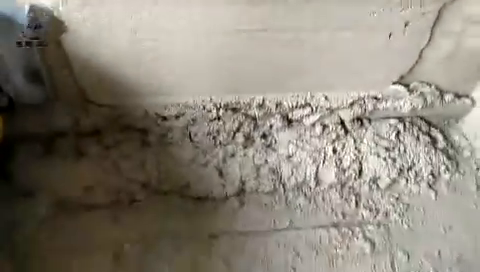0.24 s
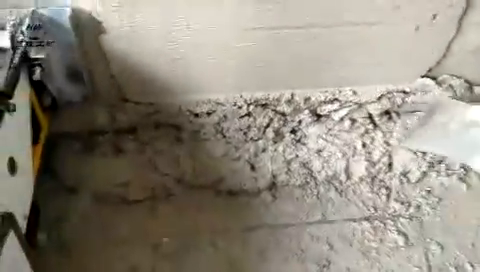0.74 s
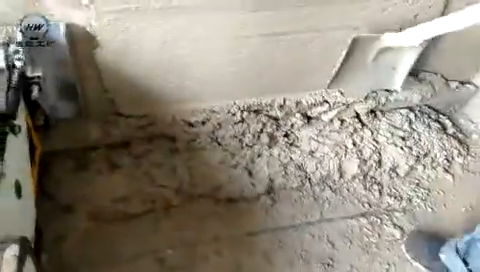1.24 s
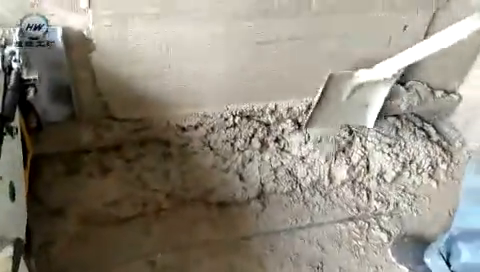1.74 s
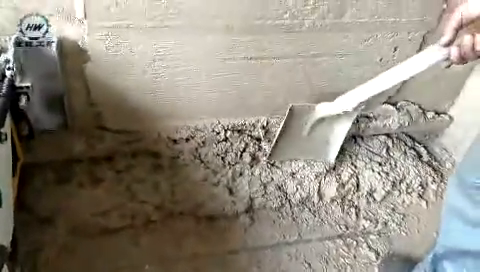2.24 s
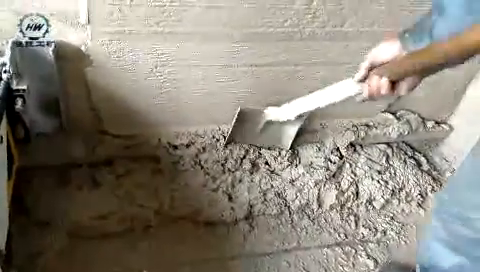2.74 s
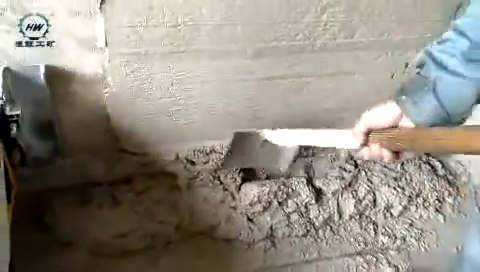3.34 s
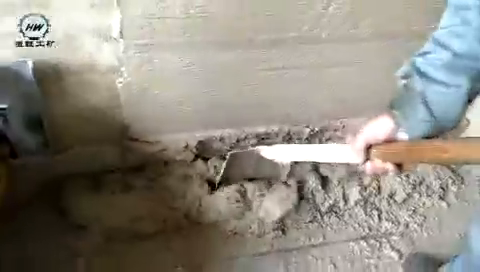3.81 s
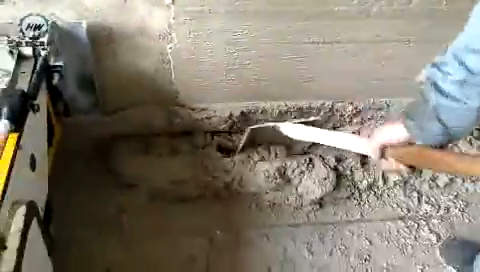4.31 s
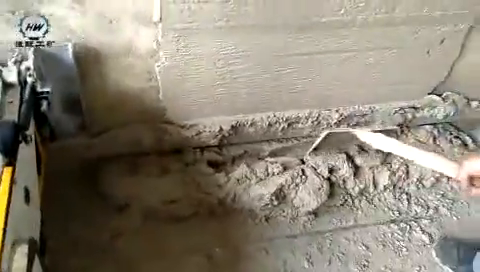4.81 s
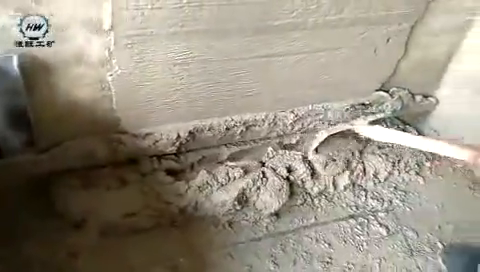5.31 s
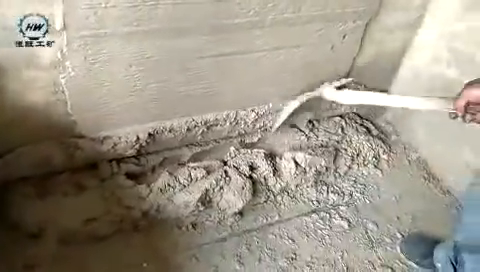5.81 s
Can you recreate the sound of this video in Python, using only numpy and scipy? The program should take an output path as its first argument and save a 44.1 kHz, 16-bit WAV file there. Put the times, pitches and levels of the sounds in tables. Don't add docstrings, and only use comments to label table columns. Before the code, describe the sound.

A steel shovel works gritty wet mortar on a concrete floor, quiet shuffles and stone ticks building to hard chops and loud scrapes in a bare room.

```python
import sys
import numpy as np
from scipy import signal
from scipy.fft import rfft, irfft
from scipy.io import wavfile
from scipy.ndimage import uniform_filter1d

SR = 44100
rng = np.random.default_rng(int(sys.argv[2]) if len(sys.argv) > 2 else 0)


def generate_wav(sig):
    pcm = np.round(np.clip(np.atleast_2d(sig).T, -1, 1) * 32767).astype(np.int16)
    wavfile.write(sys.argv[1], SR, pcm)


def gain_from_decibels(decibels):
    exponent = np.asarray(decibels, float) / 20
    return 10 ** exponent


N = 267334
OPPOSITE = np.array([[1], [-1]])
ALIKE_HZ = 1460


def unit(x):
    return x / np.sqrt(np.mean(x ** 2))


def energy_one(response):
    return response / np.sqrt(np.sum(response ** 2))


def fold(x, response):
    return signal.fftconvolve(x, response, axes=-1)[..., :N]


def highpass(x, order, cutoff_hz):
    return signal.sosfilt(signal.butter(order, cutoff_hz, "high", fs=SR, output="sos"), x)


def colour(points, size=2048):
    hz, db = np.transpose(points)
    grid_hz = np.maximum(np.arange(size + 1) * SR / (2 * size), 1)
    cepstrum = irfft(np.interp(np.log(grid_hz), np.log(hz), db) * np.log(10) / 20)
    cepstrum[1:size] *= 2
    cepstrum[size + 1:] = 0
    return irfft(np.exp(rfft(cepstrum)))[:size]


def ring(modes):
    t = np.arange(SR // 2) / SR
    return energy_one(sum(gain_from_decibels(db) * np.sin(2 * np.pi * hz * t) * 1000. ** (-t / t60_s) for hz, db, t60_s in modes))


def body(outline, modes, ring_db):
    return energy_one(np.convolve(colour(outline), np.r_[1, gain_from_decibels(ring_db) * ring(modes)]))


def walk(rate_hz):
    hold = int(SR / rate_hz)
    levels = rng.standard_normal(N // hold + 1)
    return uniform_filter1d(np.repeat(levels, hold), hold)[:N]


def swell(peak_s, peak_db, rise_s, fall_s):
    t = np.arange(N) / SR - peak_s
    return gain_from_decibels(peak_db - 20 * np.maximum(-t / max(rise_s, .003), t / max(fall_s, .003)))


def sand(spread_db, patchy_db):
    loudness = np.minimum(rng.exponential(size=N), 6)
    clicks = rng.standard_normal(N) * gain_from_decibels(spread_db * loudness)
    return unit(clicks * gain_from_decibels(patchy_db * (walk(45) + walk(160))))


# (frequency [Hz], density [dB per Hz])
AIR = [(18, -27.5), (30, 0), (49, -20.5), (92, -21), (192, -20.5), (996, -25.5), (2830, -22), (3490, -23),
       (4910, -22), (5590, -12), (8280, -29.5), (8950, -27.5), (15500, -24.5)]


def air():
    mid, side = fold(rng.standard_normal((2, N)), colour(AIR)[None])
    side = highpass(side, 1, 300)
    return unit(mid + 0.95 * side * OPPOSITE) * gain_from_decibels(-62.5 + 1.4 * walk(6))


# (peak time [s], level [dB], 20 dB rise [s], 20 dB fall [s])
STEPS = [(.001, -61, .05, 0.1), (1.21, -59.5, 0.3, 0.1), (2.06, -41, 0.04, 0.4), (2.41, -47.5, -0.25, .24),
         (3.02, -62.5, -3.3, 0.5), (3.66, -59, 0, -3.5), (3.95, -38, 0.17, 0.27), (4.15, -59.5, -0.4, -0.6),
         (5.1, -65.5, -0.1, 0.1), (5.722, -49, -0.06, .06), (5.86, -25.5, -0.13, 0), (5.92, -62, 0.2, 7)]
# (frequency [Hz], width [Hz], level [dB])
SLAB = [(69, 3.5, -6.5), (124.6, 8.13, 2.5)]


def footfalls():
    tones = ring([(hz, db, 1.5 / width_hz) for hz, width_hz, db in SLAB])
    mid, side = fold(rng.standard_normal((2, N)), tones[None])
    rest_db = -94
    weight = gain_from_decibels(rest_db) + sum(swell(*step) for step in STEPS)
    return unit(mid + 0.135 * side * OPPOSITE) * weight * gain_from_decibels(-6)


# (time [s], crack peak [dB], blade re crack [dB], knock re crack [dB])
CHOPS = [(0.061, -42, -34, -30), (0.14, -46, -17, -42), (0.7916, -43, -28, -41), (1.164, -49, -16, -16),
         (1.2077, -44, -4, -14), (2.711, -43.5, 6, -18), (2.7598, -43.5, 9.5, -1),
         (2.805, -40.5, -15, -4.5), (4.095, -20.5, -18.5, -43), (4.122, -17, 4, -10),
         (4.125, 2, -17.5, -23.5), (4.1384, -20.5, 10.5, -4), (4.1595, -17, -1.5, -16),
         (4.638, -22.5, -3, -19), (4.6418, -8, -2.5, -26), (4.6525, -6, -3, -17.5),
         (5.0943, -8.5, -11, -12), (5.103, -0.5, -16.5, -40.5), (5.1123, -3, -9, -17),
         (5.596, -36.5, -10, -28), (5.7128, -37, 7, 5.5)]
# (time [s], crack peak [dB], blade re crack [dB])
TICKS = [(0.412, -41.5, -31), (0.63, -43, -15), (0.716, -44, -17), (1.5296, -41, -16), (1.6284, -34.5, -15),
         (3.4386, -46, -21), (3.608, -30, -30), (3.517, -28.5, -20.5), (4.076, -36.5, -30),
         (4.3883, -27.5, -33), (4.4504, -21, -14), (5.5523, -44, -5), (5.5735, -44, -4), (5.6426, -41, 5),
         (5.78, -35, -24)]
# (time [s], crack peak [dB], blade, knock, thud re crack [dB])
THUDS = [
    (0.849, -51, -9, -23, -19),
    (2.0416, -19.5, 1, 7, 8.5),
    (2.558, -52.5, 4, 16.5, -14),
    (3.894, -41, -1, -3.5, 12.5),
    (5.1631, -18.5, -5, -1.8, -5),
    (5.8386, -11, -7, -21, -17),
    (5.8495, -6.5, -8, -7, -4),
]


def blows(grains, bodies):
    out, t = np.zeros(N + SR), np.arange(SR // 8) / SR
    # time, crack, blade, knock, thud, crunch length [s]
    hits = [(*chop, -42.5, .0077) for chop in CHOPS]
    hits += [(*thud, .0092) for thud in THUDS]
    hits += [(*tick, -32, -43.5, .0019) for tick in TICKS]
    for s, crack_db, blade_db, knock_db, thud_db, length_s in hits:
        shape = (1 - np.exp(-t / (0.18 * length_s))) * np.exp(-t / length_s)
        gains = gain_from_decibels(crack_db + np.array([-14, -21.5, blade_db - 4, knock_db, thud_db - 1.5]))
        start = min(int(s * SR), N - len(t))
        for gain, grain, response in zip(gains, grains, bodies):
            burst = signal.fftconvolve(shape * grain[start:start + len(t)], response)
            out[start:start + len(burst)] += gain * np.sqrt(np.sum(shape ** 2)) * energy_one(burst)
    return out[:N]


# (peak time [s], grit [dB], 20 dB rise [s], 20 dB fall [s], heap rumble re grit [dB])
SHUFFLES = [
    (.08, -47.5, 0, 0.245, -30),
    (.3, -65.5, -0.5, -0.1, -20),
    (.81, -45, 0.08, 0.12, -28.5),
    (.86, -57.5, 0.2, -0.2, -25),
    (1.64, -58, 0.2, 0.18, -21),
    (2.04, -33, 0.0444, -0.2132, -15),
    (2.376, -54, .04, -0.33, -4),
    (3.006, -50.5, -0.1, 0.03, -2.5),
    (4.09, -55, 0.08, -1.3, -1),
    (4.12, -14, -0.1775, -0.05, -32),
]
DRAGS = [
    (.53, -47.5, 0.043, 0.16, -14.5),
    (1.17, -55, 0.019, 0.16, -17.5),
    (1.225, -50.5, .06, 0.076, -24),
    (1.41, -60, 0.074, 0.51, -23),
    (1.52, -55, 0.6, 0.11, -22.5),
]
SCOOPS = [
    (2.1, -42, 0.036, 0.088, 6),
    (2.56, -53, 0.018, 0.13, 5.5),
    (3.92, -47, 0.054, 0.087, 13),
    (5.09, -44.5, 0.0083, 0.031, -15.5),
]
GRINDS = [
    (2.72, -37.5, 0.013, 0.015, -25),
    (2.765, -44, 0.022, 0.11, -34),
    (2.82, -49, 0.069, 0.47, -17),
    (2.884, -54, 0.15, 0.033, -24),
]
SIFTS = [
    (3.232, -58.5, .3, 0.21, -14),
    (3.44, -49, 0.015, 0.33, -13),
    (3.512, -38.5, 0.085, 0.092, -18.5),
    (3.61, -55, .012, .2, -5),
    (3.726, -44.5, .12, 0.11, -4),
    (3.83, -51, 0.22, 0.14, -8),
]
SLUMPS = [(2.15, -52, .05, 0.34, -18), (4.216, -49, .021, 0.29, -22), (4.38, -47.5, 0.3, 0.083, -20.5),
          (4.6, -55, 0.31, 0.016, -15.5), (4.72, -34.5, 0.013, 0.13, -48), (4.892, -51, 0.073, 0.05, -7),
          (4.99, -61.5, 0.049, 0.14, -5.5), (5.2, -41, .03, 0.15, -8), (5.41, -57.5, 0.15, 0.11, -12),
          (5.52, -61, 0.23, 0.065, -16.5), (5.92, -42.5, 0.016, 0.14, 1), (6.02, -42.5, 0.077, 0.025, -20)]
SCRAPES = [
    (5.616, -38.5, 0.065, 0.34, -29),
    (5.74, -22, 0.05, 0.077, -30),
    (5.78, -28, 0.044, 0.028, -32.5),
]


def strokes():
    # (strokes, fine sand, blade rasp, blade knock re grit [dB])
    kinds = [(SHUFFLES, -16.5, -10.5, -22.5), (DRAGS, -19, -6, -23), (SCOOPS, -16.5, 5, -5.5),
             (GRINDS, -16, -6, -12), (SIFTS, -14, -11, -37.5), (SLUMPS, -12, -8.5, -20.5),
             (SCRAPES, -31.5, -5.5, -26)]
    gains = np.zeros((5, N))
    for rows, fine_db, rasp_db, knock_db in kinds:
        for *stroke, heap_db in rows:
            heap = gain_from_decibels(heap_db)
            mix = np.array([1, gain_from_decibels(fine_db), gain_from_decibels(rasp_db), gain_from_decibels(knock_db) + heap, heap])
            gains += mix[:, None] * swell(*stroke)
    return gains * gain_from_decibels([-12, -7, -2.5, -10.5, -7.5])[:, None]


# (time [s], peak [dB], frequency [Hz], rub length [s])
CLINKS = [(0.522, -61, 660, .03), (0.854, -60, 500, 0.027), (1.2, -62.5, 600, 0.033),
          (1.39, -57, 1770, .015), (1.479, -47, 2400, 0.036), (2.042, -17.5, 810, .012),
          (2.559, -50.5, 357, 0.022), (2.569, -46.5, 1340, 0.035), (2.562, -47, 2300, .04),
          (2.754, -42, 1040, 0.01), (2.758, -44, 1770, .01), (2.803, -42, 1080, .04),
          (2.815, -46, 1550, .04), (2.839, -57, 760, .03), (3.897, -44, 1900, 0.02), (3.902, -48, 772, .04),
          (4.126, -22, 840, 0.018), (4.141, -26.5, 2330, 0.012), (4.65, -29, 905, 0.019),
          (5.111, -28, 614, 0.021), (5.572, -44.5, 3100, 0.011), (5.615, -48.5, 1900, 0.013),
          (5.634, -30, 3100, .012), (5.71, -34, 620, .05), (5.168, -30, 620, .03), (5.848, -22, 566, 0.018)]


def clinks(grain):
    out, t = np.zeros(N + SR), np.arange(SR // 6) / SR
    decay_cycles = 18
    for s, db, hz, length_s in CLINKS:
        start = int(s * SR)
        rub = grain[start:start + len(t)] * np.exp(-t / max(length_s, .003))
        panel = np.sin(2 * np.pi * hz * t) * 1000. ** (-t * hz / decay_cycles)
        tone = highpass(np.convolve(rub, panel[:SR // 20]), 3, .6 * hz)
        out[start:start + len(tone)] += gain_from_decibels(db) * tone / np.abs(tone).max()
    return out[:N]


# (frequency [Hz], level [dB])
GRIT = [(1800, -91), (3200, 2.5), (4000, 2), (5500, -2.5), (7000, -2), (8500, -29), (12000, -50.5)]
FINE = [(5000, -53.5), (7000, 5), (8000, 8.5), (10000, 7.5), (12500, 1), (14800, -17)]
RASP = [(500, -59), (1000, -4), (1400, -0.5), (2300, 5), (3300, -1), (4500, -17), (9000, -82.5)]
KNOCK = [(200, -63.5), (420, -12.5), (600, 1), (900, 1), (1300, -6), (2500, -24), (6000, -88.5)]
HEAP = [(30, -44.5), (100, -16), (200, 1.5), (330, 8), (500, -0.5), (900, -36.5), (2000, -69.5)]
# (frequency [Hz], level [dB], T60 [s])
BLADE = [(885, 0, .15), (1660, -3, .1), (2290, -4, .1)]
ROOM_MODES = [(182, 0, 0.45), (233.7, 0, 0.51), (370, 1, 0.23), (433, -8, 0.51), (475, -6.5, .25),
              (119.2, 16.5, 0.092)]


def shovel():
    bodies = (energy_one(colour(GRIT)), energy_one(colour(FINE)), body(RASP, BLADE, -30),
              body(KNOCK, BLADE, -37.5), body(HEAP, ROOM_MODES, -21.5))
    crunch, chatter, lumps = sand(3.2, 2.8), sand(3.2, 3.2), sand(1.5, 1.4)
    grains = crunch, crunch, chatter, lumps, lumps
    stroked = sum(fold(gain * grain, response) for gain, grain, response in zip(strokes(), grains, bodies))
    return blows(grains, bodies) + stroked + clinks(chatter)


def ports(near):
    wander_s, treble_db, lean = 0.0092, 1.5, 0.24
    treble = highpass(near, 1, ALIKE_HZ) * gain_from_decibels(treble_db)
    side = treble * (lean + unit(walk(1 / wander_s)))
    return (near + side * OPPOSITE) * gain_from_decibels([[.7], [-.7]])


# (frequency [Hz], T60 [s])
ROOM_T60 = [(100, 0.2), (260, 0.34), (700, 0.28), (1840, 0.19), (4850, 0.18), (12800, 0.19)]


def room():
    t, tail, build_s = np.arange(int(.7 * SR)) / SR, 0, 0.0026
    hz, t60_s = np.transpose(ROOM_T60)
    for centre_hz in 2 ** np.arange(6, 14.3, .5):
        edges_hz = [centre_hz * 2 ** -.25, centre_hz * 2 ** .25]
        band = signal.butter(2, edges_hz, "band", fs=SR, output="sos")
        mid, side = signal.sosfilt(band, rng.standard_normal((2, len(t))))
        fade = 1000. ** (-t / np.interp(np.log(centre_hz), np.log(hz), t60_s))
        wide = np.clip(centre_hz / ALIKE_HZ, .15, 1)
        echo = energy_one(mid * fade) + wide * energy_one(side * fade) * OPPOSITE
        tail = tail + echo / np.sqrt(35 * (1 + wide ** 2)) * np.sqrt(centre_hz / 1000)
    return tail * (1 - np.exp(-(t / build_s) ** 2))


def scene():
    near = shovel()[None]
    wet_db = -1.5
    return ports(near) + gain_from_decibels(wet_db) * fold(near, room()) + footfalls()


# (frequency [Hz], level [dB])
PORT = [(3500, 0), (4700, 10), (5800, 19), (6800, 7), (8000, 6), (12000, 8.5), (14800, 29.5), (15600, 15.5),
        (16100, -30.5), (16900, -59)]


def microphone(dry):
    lifted = fold(dry, colour(PORT)[None]) * gain_from_decibels(-4.5)
    return .75 * np.tanh((lifted + air()) / .75)


# (frequency [Hz], readiness to fall silent [spreads of chance])
SILENT_BANDS = [(1200, -3.5), (2600, -1.3), (3600, -.8), (5200, -2.2), (6500, -1.7), (8000, -.6), (12000, -.5),
                (16000, -.4)]


def silence_bands(x, size=1024, count=7):
    mask_db, mask_slope_db, jump_db = 24, 16, 7
    lead = size - 53
    hz, _, z = signal.stft(np.pad(x, ((0, 0), (lead, 0))), SR, "cosine", 2 * size)
    band, band_hz = np.arange(len(hz)) // count, hz[::count]
    power = uniform_filter1d(np.mean(np.abs(z) ** 2, axis=0), count, axis=0)
    db = 10 * np.log10(power + 1e-14)[::count]
    chance = unit(uniform_filter1d(rng.standard_normal(db.shape), 3, axis=1))
    ready = np.interp(band_hz, *np.transpose(SILENT_BANDS))[:, None]
    ready = ready + (db.max(axis=0) - db - mask_db) / mask_slope_db
    jump = np.diff(db.mean(axis=0), prepend=0) > jump_db
    keep = (chance > ready) | jump | np.roll(jump, 1) | (band_hz[:, None] < SILENT_BANDS[0][0])
    return signal.istft(z * keep[band], SR, "cosine", 2 * size)[1][:, lead:lead + N]


def top_cut(x):
    return signal.sosfilt(signal.butter(12, 16990, fs=SR, output="sos"), x)


def record(dry):
    top = colour([(15700, 0), (16200, -25), (16900, -70)])
    offset = -.0004
    mix = fold(silence_bands(microphone(dry)), top[None]) + offset
    return top_cut(mix)


dry = scene()
out = record(dry)
generate_wav(out)
```